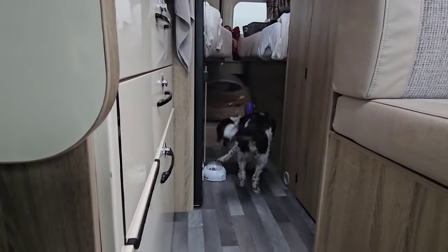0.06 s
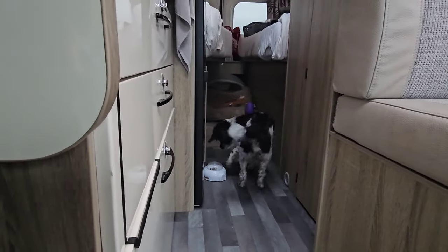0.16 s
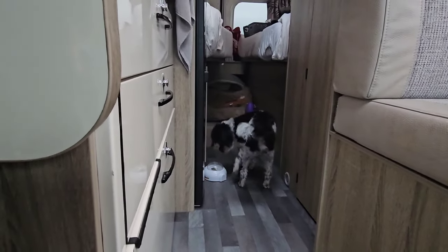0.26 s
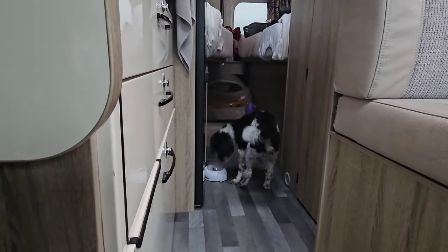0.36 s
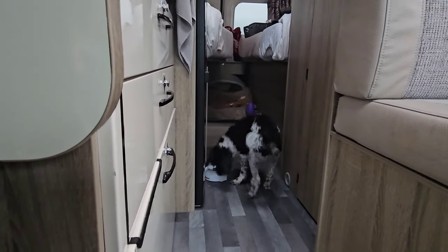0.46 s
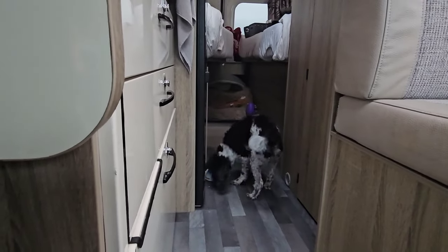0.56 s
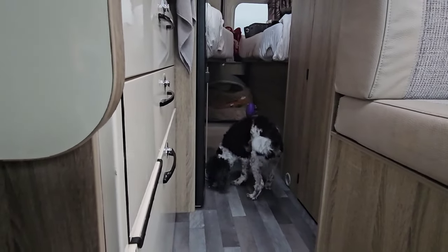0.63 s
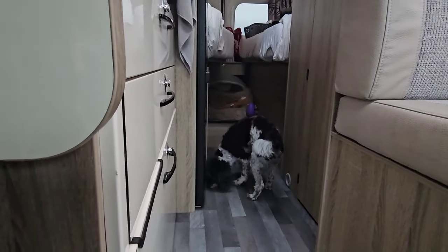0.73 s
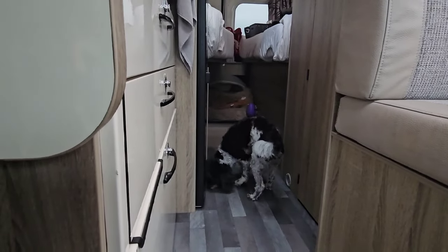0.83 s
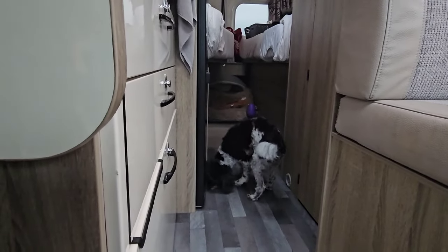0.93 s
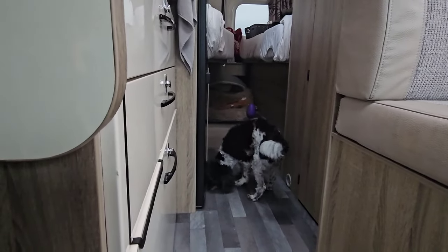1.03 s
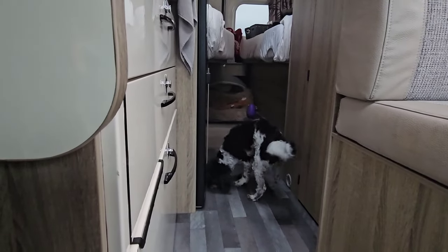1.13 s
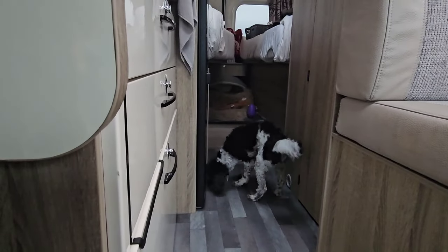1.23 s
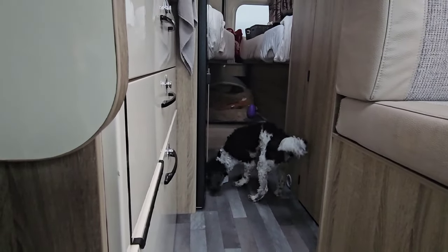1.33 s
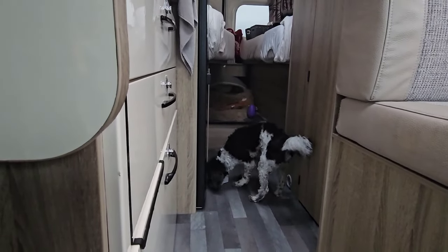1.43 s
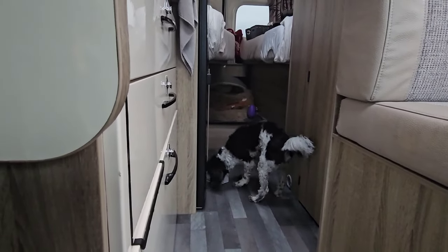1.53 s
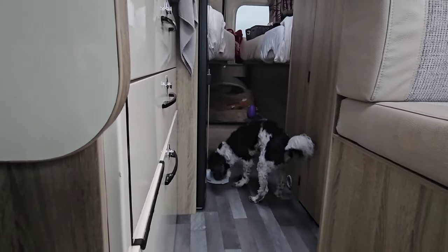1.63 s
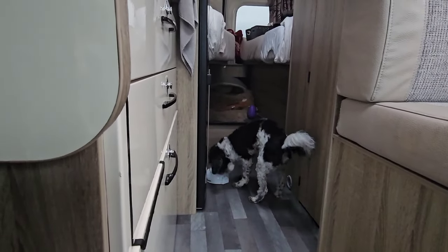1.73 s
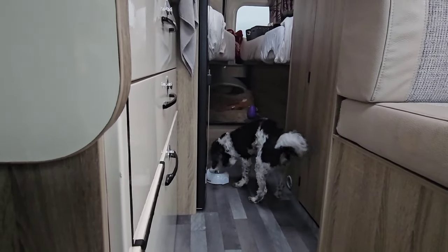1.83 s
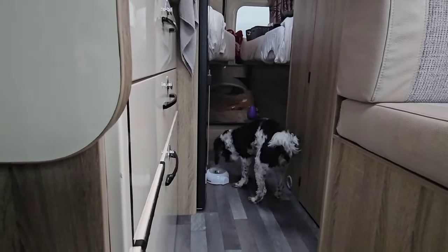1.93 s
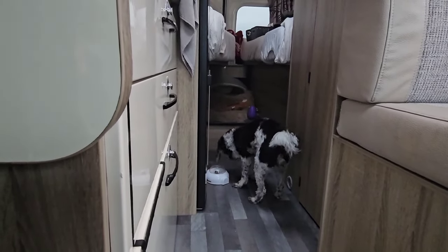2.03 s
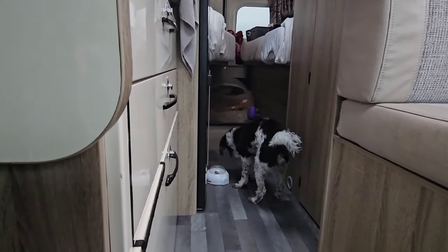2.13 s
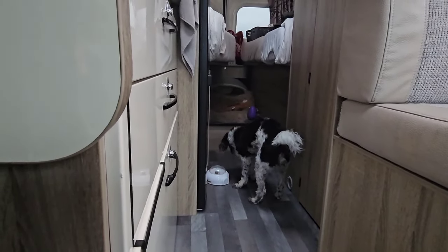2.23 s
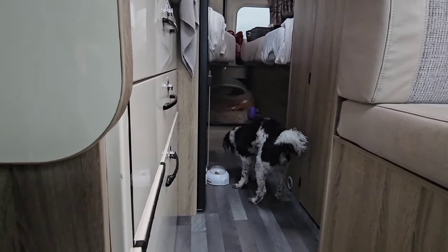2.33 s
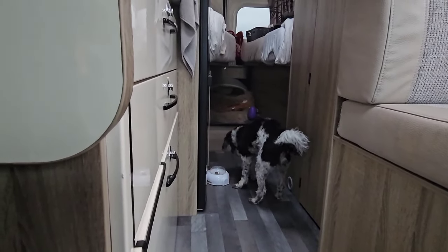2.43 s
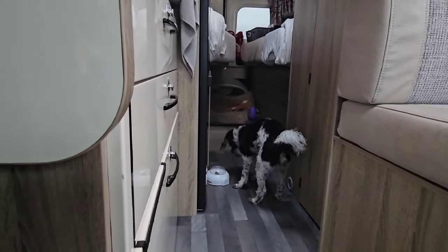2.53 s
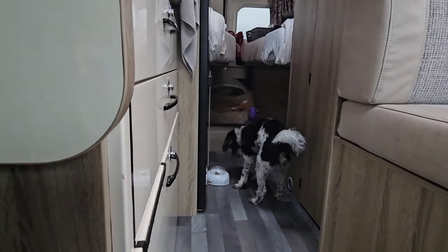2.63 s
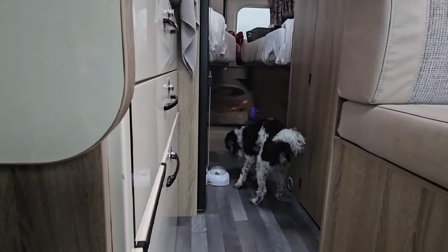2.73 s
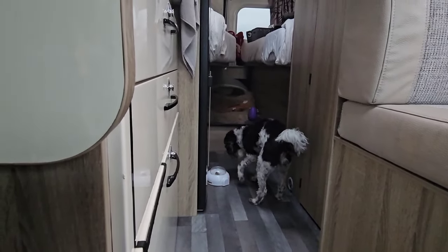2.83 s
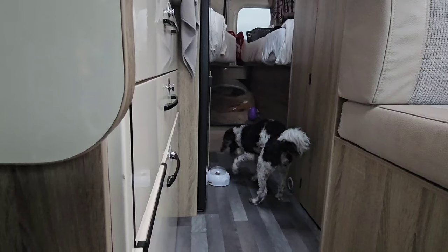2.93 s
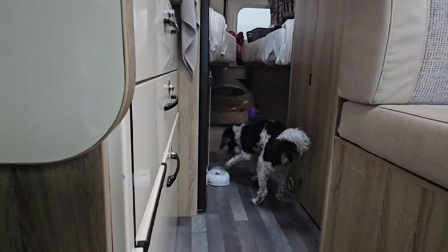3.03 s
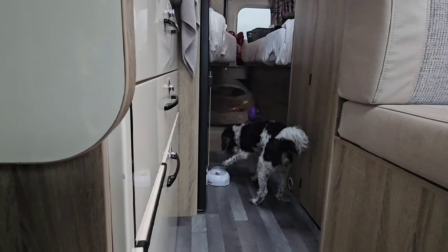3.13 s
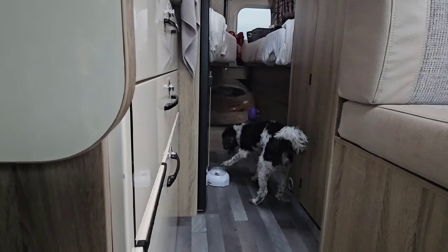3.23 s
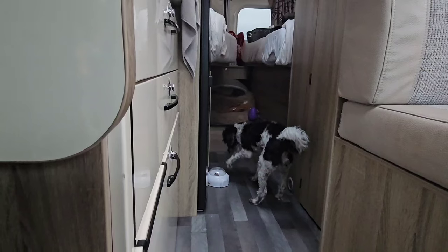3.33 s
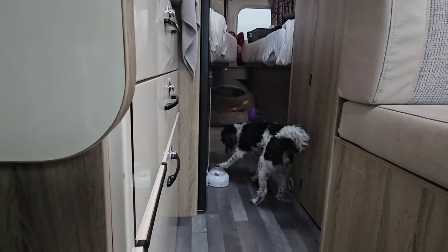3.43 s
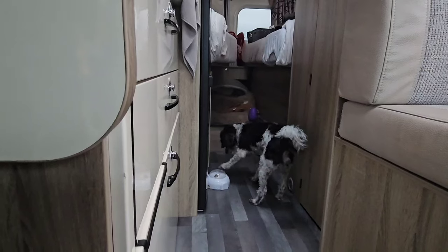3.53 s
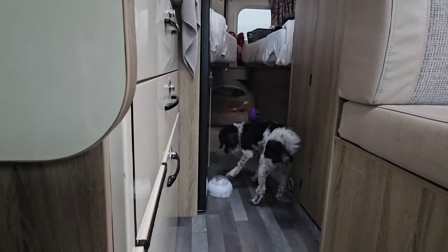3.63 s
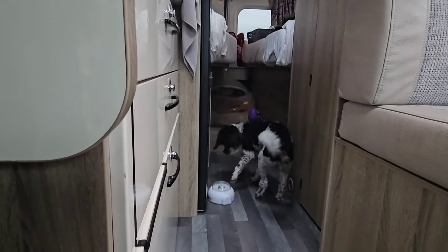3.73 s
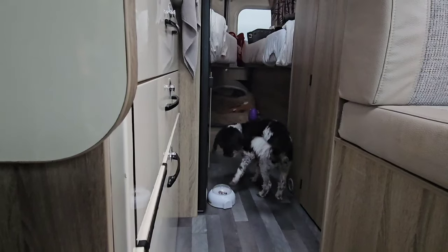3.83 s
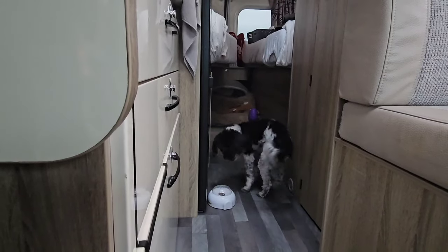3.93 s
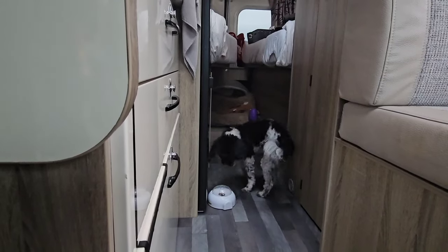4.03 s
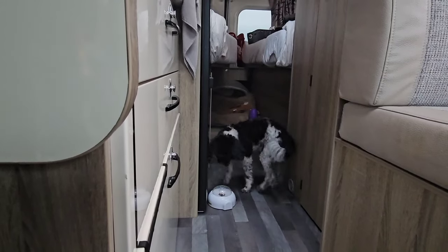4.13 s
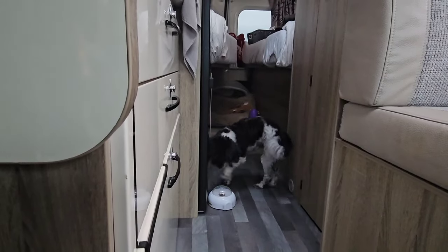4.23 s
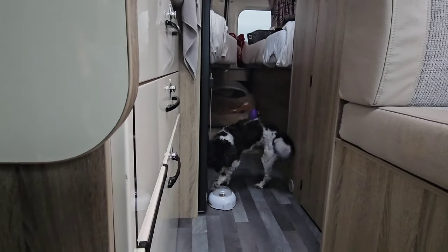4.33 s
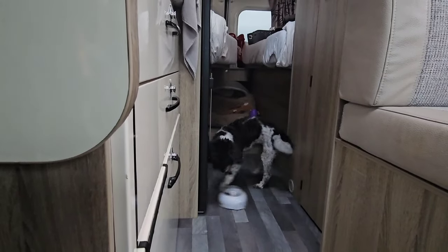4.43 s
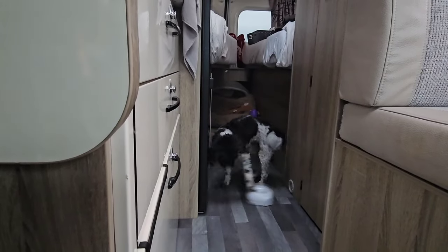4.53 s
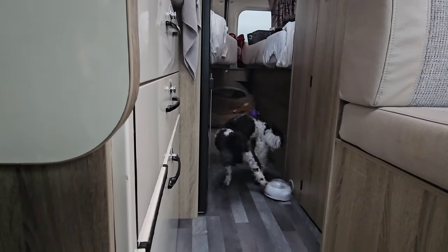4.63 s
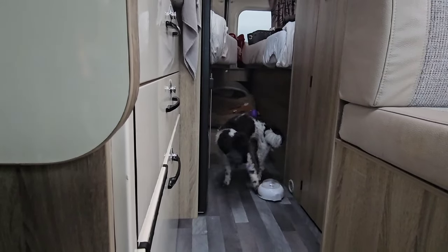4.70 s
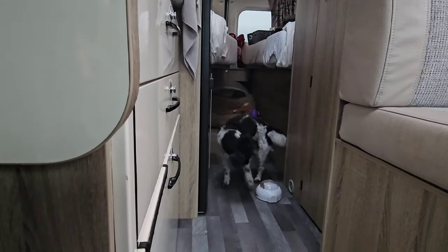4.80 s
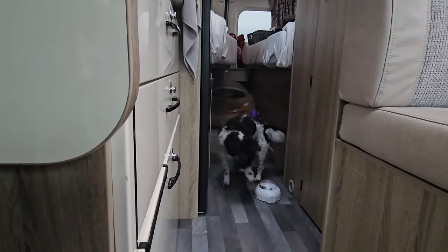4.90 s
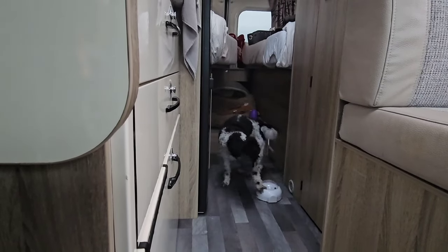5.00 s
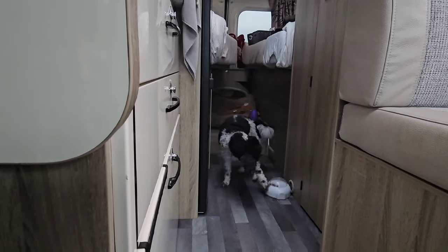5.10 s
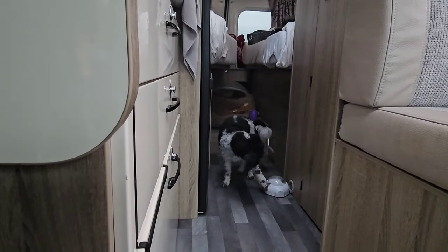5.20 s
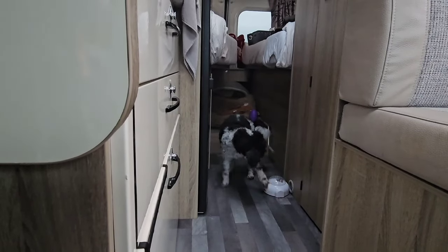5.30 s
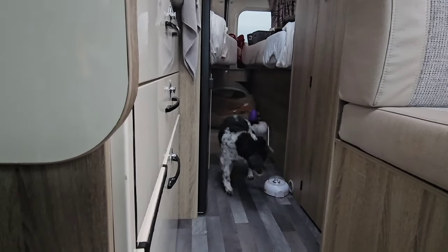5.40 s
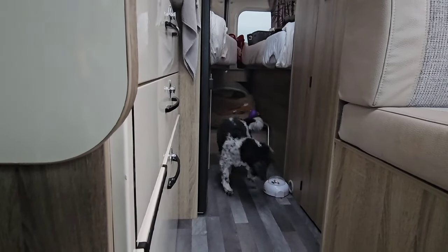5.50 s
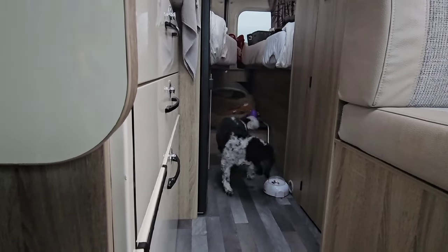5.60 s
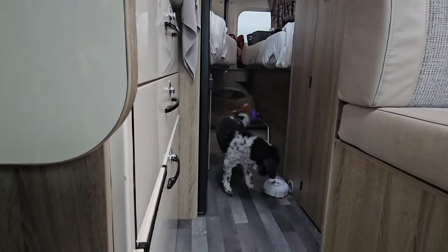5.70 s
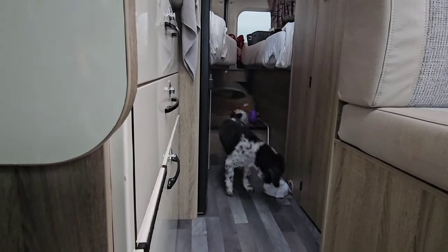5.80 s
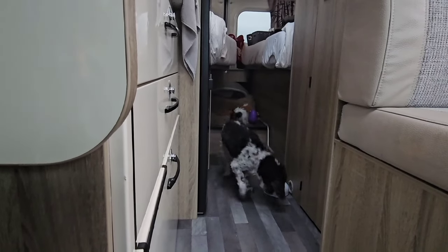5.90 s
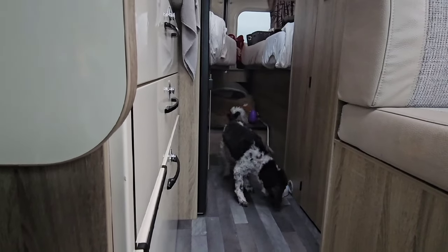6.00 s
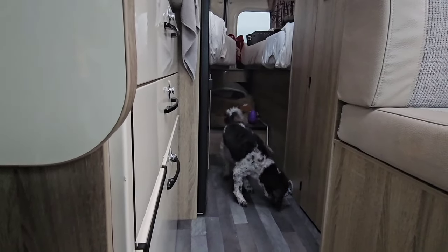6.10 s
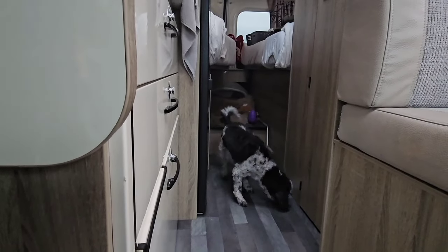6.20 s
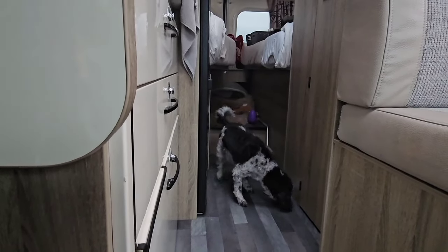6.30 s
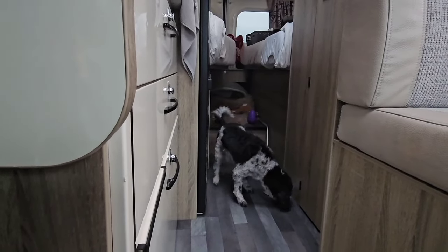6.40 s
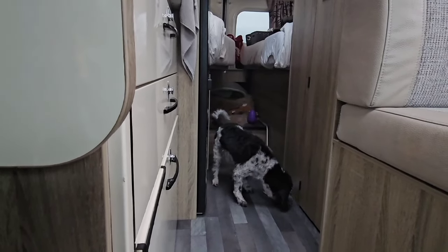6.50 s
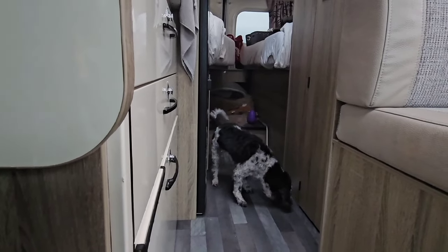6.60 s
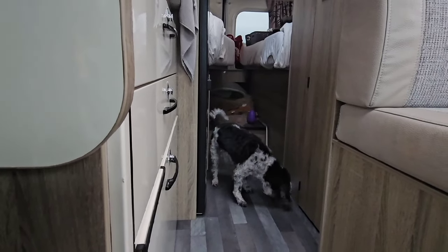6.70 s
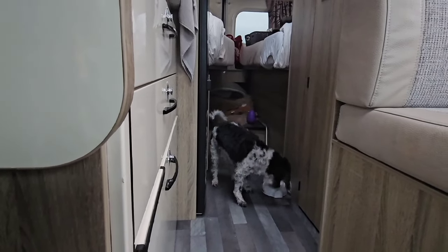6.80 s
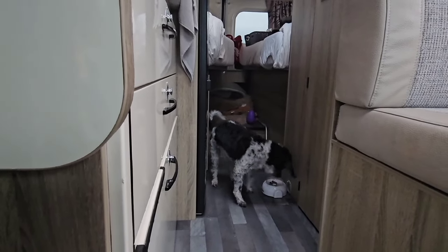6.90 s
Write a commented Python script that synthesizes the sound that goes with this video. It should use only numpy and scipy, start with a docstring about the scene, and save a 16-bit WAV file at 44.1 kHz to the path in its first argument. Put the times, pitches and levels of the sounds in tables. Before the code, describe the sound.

A bright claw clack on a plastic shell opens, followed by near quiet with faint air noise, low hum, ticking claws and gentle muzzle bumps. After three seconds the toy is pawed, scuffing and tapping on the hard floor, then swiped noisily with treats rattling and hollow bangs. Afterwards only soft paws and nudges remain. Short, tight indoor echoes; some dry handling rasp on the camera microphone.

```python
"""Small dog with a treat toy

A small dog works a hollow plastic treat toy along the vinyl floor of a camper van.
Claws clack on the shell, the muzzle knocks and nudges it, and swipes send it scraping into the cupboards.
Paws step and brush about, and fingers rub on the camera, over faint air noise and a low hum.
Blows ring shaped spectra, rubbing is many tiny slips, and random echoes make the narrow cabin.
"""
import sys
import numpy as np
from scipy import signal
from scipy.fft import rfft, irfft
from scipy.io import wavfile
from scipy.ndimage import uniform_filter1d

SR = 44100
rng = np.random.default_rng(int(sys.argv[2]) if len(sys.argv) > 2 else 0)


def persist_wave(psi):
    """Save psi, clipped to +-1, as 16-bit WAV."""
    counts = np.round(np.clip(psi, -1, 1) * 32767).astype(np.int16)
    wavfile.write(sys.argv[1], SR, np.atleast_2d(counts).T)


N = 306495
TIME = np.arange(N) / SR  # seconds

# Resonances of the toy's shell. Each row: pitch in Hz, width in Hz, lift in dB.
SHELL_MODES = [(210.7, 19, 15), (296, 36, 13), (340, 30, 7.5), (482.7, 56, 9), (604, 34, 6.5),
               (1410, 70, 10.5), (810, 110, 3.5), (1980, 46, 4.5), (2410, 68, 7), (2656, 34, 5),
               (3088, 71, 5.5), (4870, 71, 6)]


def amp(db):
    """Turns decibels into a gain."""
    return 10 ** (np.asarray(db) / 20)


def evened(x):
    """Scales a signal to an average (rms) level of 1."""
    return x / np.sqrt(np.mean(x ** 2) + 1e-20)


def read(points, hz):
    """Reads values between the points of a table, on a log-frequency axis."""
    f, value = np.transpose(points)
    return np.interp(np.log(hz + 1), np.log(f + 1), value)


def add(mix, s, sound):
    """Mixes a stereo sound in at time s, in seconds."""
    part = mix[:, max(round(s * SR), 0):][:, :sound.shape[1]]
    part += sound[:, :part.shape[1]]


def level(rows, column=1, power=1.34):
    """Gain of strokes that speed up, hold and slow down evenly; loudness is a power of speed."""
    gain = np.zeros(N)
    for row in rows:
        corners = np.cumsum([row[0], *row[-3:]])
        speed = np.interp(TIME, corners, [0, 1, 1, 0])
        gain += amp(row[column]) * speed ** power
    return gain


def ring(spectrum, modes=(), bright=0, spot_db=0, size=4096):
    """Response of a struck body: a broad spectrum, lifted at resonances and rippled by the spot hit."""
    hz = abs(np.fft.fftfreq(size, 1 / SR))
    # brightness tilts the spectrum in dB per octave; it levels off below 300 Hz
    db = read(spectrum, hz) + bright * np.log2(np.maximum(hz, 300) / 1000)
    for centre, width, lift in modes:
        db = db + lift / (1 + (2 * (hz - centre) / width) ** 2)
    knots = np.geomspace(500, 16000, 80)
    db = db + spot_db * np.interp(hz, knots, rng.standard_normal(len(knots)))
    # minimum phase: the sound starts at the contact, never before it
    bins = np.exp(signal.hilbert(np.log(amp(db))).conj())
    return np.fft.ifft(bins).real[None, :size // 2]


def at_microphones(pair):
    """Two unrelated signals become alike in the bass, as at two close microphones."""
    # Each row: pitch in Hz, likeness of left and right (1 is identical).
    likeness = [(100, .98), (250, .94), (500, .88), (800, .78), (1300, .1), (2800, .2), (5000, 0.02)]
    a, b = rfft(pair)
    same = read(likeness, np.fft.rfftfreq(pair.shape[1], 1 / SR))
    shared, apart = a * np.sqrt(1 + same), b * np.sqrt(1 - same)
    return irfft([shared + apart, shared - apart], pair.shape[1])


def cabin(near_db=-4.5, near_s=0.03, late_db=-21.0, late_t60=0.23, size=12000):
    """Reflections from one spot in the aisle: strong near walls, a quick decay and a faint long tail."""
    # Quick decay of the echoes. Each row: pitch in Hz, time to fall by 60 dB in seconds.
    decay_times = [(100, 0.26), (500, 0.11), (1500, 0.16), (5000, 0.16), (14000, 0.19)]
    t = np.arange(size) / SR
    echoes = rng.choice([-1., 1.], (2, size)) * (rng.random((2, size)) < .15)
    bins, hz = rfft(at_microphones(echoes)), np.fft.rfftfreq(size, 1 / SR)
    tail = amp(late_db) * np.exp(-np.log(1000) * t / late_t60)
    out = 0
    for centre, t60 in decay_times:
        # each band fades out towards the neighbouring rows
        band = read([(f, float(f == centre)) for f, _ in decay_times], hz)
        out = out + irfft(bins * band, size) * (np.exp(-np.log(1000) * t / t60) + tail)
    return out * (1 + amp(near_db) * np.exp(-t / near_s))


def blow(body, db, build_s=.0015, snap_db=-40, snap_s=.004, size=440):
    """One blow, heard by its echoes; snap lifts the first ones, db sets the loudest 10 ms."""
    paths = cabin()
    t = np.arange(paths.shape[1]) / SR
    paths = paths * (1 - np.exp(-t / build_s)) * (1 + amp(snap_db) * np.exp(-t / snap_s))
    sound = signal.fftconvolve(paths, body, axes=1)
    loudest = uniform_filter1d((sound ** 2).mean(0), size).max()
    return amp(db) * sound / np.sqrt(loudest)


def strikes(rows, spectrum, modes, gain_db, thud_db, thud_lag, snap_db):
    """Hard contacts: the body rings at once and the floor thuds just after (thud_lag in seconds)."""
    # Spectrum of the thud. Each row: pitch in Hz, level in dB.
    thud_spectrum = [(25, -50), (90, -7), (150, 3.5), (205, 3.5), (265, -10.5), (3000, -52)]
    out = np.zeros((2, N))
    for s, db, bright, thud in rows:
        body = ring(spectrum, modes, bright, spot_db=3.5)
        add(out, s, blow(body, db + gain_db, snap_db=snap_db))
        add(out, s + thud_lag, blow(ring(thud_spectrum), db + thud + thud_db))
    return out


def touches(rows, spectrum, gain_db, width_hz, lift_db, soft_s):
    """Light, dull blows on the toy; the spot that is touched decides which mode rings most."""
    out = np.zeros((2, N))
    for s, db, hz in rows:
        body = ring(spectrum, [(hz, width_hz, lift_db)])
        add(out, s, blow(body, db + gain_db, soft_s))
    return out


def slips(per_s, spread_db):
    """Friction as many tiny slips of uneven size, at random moments."""
    train = (rng.random(N) < per_s / SR) * rng.choice([-1., 1.], N)
    return train * amp(spread_db * np.minimum(rng.exponential(1, N), 4))


def rubbing(body, per_s, spread_db):
    """Slips make a body ring in the cabin."""
    paths = signal.fftconvolve(cabin(), body, axes=1)
    return evened(signal.oaconvolve(slips(per_s, spread_db)[None], paths, axes=1)[:, :N])


def claw_clacks():
    """Claws strike the shell: its rim rings and the paw thuds a moment later."""
    # Each row: start in seconds, level in dB before a common gain, brightness in dB per octave,
    # paw thud in dB against that level before a common gain.
    hits = [(0.1143, -20, 4.5, -34.5), (3.1373, -30, 4.3, -26), (3.5112, -17, 2, -19.5),
            (4.3835, -16.5, 3.5, -21), (4.458, -36, 4.5, -23), (5.0595, -17.5, 4.5, -18.5)]
    # Each row: pitch in Hz, level in dB.
    spectrum = [(200, -23), (1100, -8.5), (3000, -2.5), (5500, 2.5), (8800, -2.5), (10300, -8), (13000, -4),
                (16000, -9.5)]
    # Resonances of the rim. Each row: pitch in Hz, width in Hz, lift in dB.
    rim_modes = [(850, 47, 23), (1467, 130.8, 17), (4670, 429, 14), (5370, 210, 8), (6980, 960, 8.1),
                 (8660, 1200, 7.1)]
    return strikes(hits, spectrum, rim_modes, gain_db=-2.0, thud_db=-5.5, thud_lag=0.0055, snap_db=-10.0)


def treats(per_s=70, spread_db=2.5, count=3):
    """Loose treats and grit hit the shell, each piece with its own colour."""
    # Each row: pitch in Hz, level in dB.
    spectrum = [(40, -41.5), (300, -17.5), (1900, 1), (6500, -2), (10000, -15.5), (13000, -12.5),
                (16000, -22)]
    pieces = [rubbing(ring(spectrum, SHELL_MODES, spot_db=3.5), per_s, spread_db) for _ in range(count)]
    return evened(sum(pieces))


def slide(judder_db=3.0, rattle_db=-2.0, scuff_db=-12.0, scuff_power=0.81, travel_hz=2.4, size=700):
    """A lightly dragged toy mostly scuffs; pressed hard, its rim sticks and slips and treats rattle."""
    # Shoves of the toy. Each row: start in seconds, drag on the floor in dB and grit under the rim
    # in dB (both shaped further below), speed-up, glide and slow-down in seconds.
    shoves = [(.115, -42, -38.5, 0.018, 0.016, 0.12), (3.28, -40.5, -45.5, 0.087, 0.0093, 0.089),
              (3.53, -33.5, -38, 0.1, 0.085, .37), (3.76, -66, -46.5, 0.036, 0.022, 0.037),
              (4.44, -20.5, -17, 0.17, 0.15, .06), (4.81, -34, -30, 0.036, 0.015, 0.21),
              (5.04, -28, -28.5, .17, 0.044, 0.089)]
    # Sticking rim. Each row: pitch in Hz, level in dB.
    drag_spectrum = [(25, -59.5), (50, -36), (120, 2), (190, -2), (250, -14.5), (400, -0.5), (750, -1),
                     (1100, -18.5), (2500, -23), (9000, -65)]
    # Light scuff. Each row: pitch in Hz, level in dB.
    scuff_spectrum = [(100, -0.5), (450, -4), (800, -0.5), (1500, -2), (8000, -38.5)]
    grip = amp(1.2 * evened(uniform_filter1d(rng.standard_normal(N), size)))  # uneven pressure
    drag = grip * level(shoves, column=1, power=1.4)
    grit = grip * level(shoves, column=2, power=2.0)
    turn = 2 * np.pi * travel_hz * TIME
    out = 0
    # the echoes change as the toy travels: two sets of them trade places
    for place in (np.sin(turn), np.cos(turn)):
        judder = rubbing(ring(drag_spectrum, SHELL_MODES), per_s=400, spread_db=2.5)
        judder = amp(judder_db) * drag ** 1.153 * judder
        scuff = rubbing(ring(scuff_spectrum, spot_db=5.5), per_s=250, spread_db=2.5)
        scuff = amp(scuff_db) * drag ** scuff_power * scuff
        rattle = amp(rattle_db) * grit * treats()
        out = out + place * (judder + scuff + rattle)
    return out


def chatter(count=4, first_gap_s=.0095, gap_growth=1.6, loss_db=3):
    """Turns a chattering bump into a run of ever weaker strikes, ever further apart."""
    # Each row: start in seconds, level in dB before a common gain, brightness in dB per octave,
    # floor thud in dB against that level before a common gain, chatter time in seconds.
    first_hits = [(3.641, -30, -1.5, 4.5, 0), (3.793, -49, -4, -11, 0), (4.546, -24, -3, 5, 0),
                  (4.629, -13.5, -4.5, -15, 0), (4.716, -9.5, 0.5, -29, .035), (4.777, -14.5, -3.5, -7, 0),
                  (4.852, -21, -3.5, 1.5, 0), (5.195, -10.5, -1.8, -7, .06)]
    rows = []
    for s, db, bright, thud, length in first_hits:
        lag = 0
        for k in range(count):
            if lag <= length:
                rows.append((s + lag, db - k * loss_db, bright, thud))
            lag += first_gap_s * gap_growth ** k
    return rows


def cupboard_bumps():
    """The toy hops and hits the cupboards, so its whole shell rings."""
    # Each row: pitch in Hz, level in dB.
    spectrum = [(25, -53), (60, -23.5), (170, -3), (250, -14.5), (400, 2), (1100, -6.5), (2200, -0.5),
                (6500, -1.5), (8600, -3), (10000, -11), (13000, -8.5), (16000, -14.5)]
    return strikes(chatter(), spectrum, SHELL_MODES,
                   gain_db=-0.5, thud_db=-6.5, thud_lag=.003, snap_db=-14.5)


def light_taps():
    """Light, dull taps on the toy, each time with another main pitch: first a paw lands on it, then the tipping
    toy taps its rim on the floor."""
    # Each row: start in seconds, level in dB before a common gain, main pitch in Hz.
    hits = [(3.158, -40, 860), (3.587, -38, 840), (3.955, -49.5, 496), (4.484, -37, 700), (4.992, -38, 470)]
    # Each row: pitch in Hz, level in dB.
    spectrum = [(80, -12), (600, -2), (1400, -6.5), (10000, -40)]
    return touches(hits, spectrum, gain_db=-2.0, width_hz=70, lift_db=14.5, soft_s=0.0023)


def knocks(nose_db=-5.0, soft_s=0.00093):
    """Soft nose blows ring the low modes of the hollow toy, each at another spot."""
    # Each row: start in seconds, level in dB before a common gain.
    hits = [(1.5485, -23), (1.5555, -19.5)]
    # Each row: pitch in Hz, level in dB.
    spectrum = [(80, -22), (230, -1.5), (450, 0.5), (900, -14), (1800, -26), (16000, -44)]
    # Resonances of the hollow toy. Each row: pitch in Hz, width in Hz, lift in dB.
    hollow_modes = [(235, 50, 4), (339, 50, 8), (560, 80, 16), (786, 50, 15), (1010, 100, 8)]
    out = np.zeros((2, N))
    for s, db in hits:
        body = ring(spectrum, hollow_modes, spot_db=2)
        add(out, s, blow(body, db + nose_db, soft_s))
    return out


def muzzle(rub_db=-4.5):
    """The muzzle nudges the toy at changing spots and stays pressed on it, a dull rumble."""
    # Nudges. Each row: start in seconds, level in dB before a common gain, main pitch in Hz.
    nudges = [(1.701, -43, 380), (1.879, -42.5, 371), (1.919, -44, 657), (2.023, -36, 520),
              (2.132, -40, 500), (2.226, -38.5, 225), (2.339, -42.5, 638), (2.437, -49, 380),
              (2.534, -45, 517), (2.622, -43, 434), (2.669, -44, 415), (6.165, -42, 230), (6.222, -43, 369),
              (6.313, -36, 376), (6.477, -42, 358), (6.631, -46.5, 366)]
    # Presses. Each row: start in seconds, level in dB before a common gain, rise, hold and fall in seconds.
    presses = [(1.7, -50, 0.32, 0.703, 0.086), (6.16, -55, 0.047, 0.2, 0.061)]
    # Each row: pitch in Hz, level in dB.
    spectrum = [(120, -15.5), (215, 3.5), (290, -6.5), (375, 3), (680, -2), (1000, -18), (9000, -47)]
    nudging = touches(nudges, spectrum, gain_db=-3.5, width_hz=36, lift_db=10, soft_s=0.01)
    rumble = rubbing(ring(spectrum), per_s=500, spread_db=0.0)
    return nudging + amp(rub_db) * level(presses, power=0.33) * rumble


def boom(start_s=3.648, swell_s=0.024):
    """The floor panel booms under the tipping toy: one low mode that swells and dies away."""
    # One row: level in dB before the swell and decay, pitch in Hz, time to fall by 60 dB in seconds.
    panel_mode = (-21, 66, 0.4)
    db, hz, t60 = panel_mode
    t = np.maximum(TIME - start_s, 0)
    shape = (1 - np.exp(-t / swell_s)) * np.exp(-np.log(1000) * t / t60)
    return amp(db) * shape * np.sin(2 * np.pi * hz * t)


def claw_steps():
    """Claws tick on the floor, each with a thud of the paw just after."""
    # Each row: start in seconds, level in dB before a common gain, brightness in dB per octave,
    # paw thud in dB against that level before a common gain.
    hits = [(.197, -40.5, 5, -22), (.4471, -35, -0.5, -7.5), (.5512, -40, 2, -28),
            (1.1688, -42.5, -4.5, -22), (1.2598, -43, 1, 1.5), (1.5535, -32, -1, -44),
            (2.0069, -38, 0, -12), (3.239, -50.5, 1.5, -20), (4.2245, -38, -0.5, -8),
            (5.4775, -40, 1, -3.5), (5.804, -51, 0, -28), (6.048, -42, -1, -17)]
    # Each row: pitch in Hz, level in dB.
    spectrum = [(100, -8), (500, -1.5), (4800, 2), (8500, -3.5), (10200, -19.5), (16000, -15)]
    return strikes(hits, spectrum, (), gain_db=-1.5, thud_db=-3.5, thud_lag=0.00275, snap_db=2.0)


def pats(pad_db=-2.5, soft_s=0.004):
    """The pads of the shifting feet land softly, so each blow builds up slowly."""
    # Each row: start in seconds, level in dB before a common gain.
    landings = [(0.974, -59.5), (1.2, -49), (5.385, -45.5), (5.545, -59.5)]
    # Each row: pitch in Hz, level in dB.
    spectrum = [(1000, -1), (2800, 10.5), (5000, -9), (11000, -29)]
    out = np.zeros((2, N))
    for s, db in landings:
        add(out, s, blow(ring(spectrum, spot_db=1.5), db + pad_db, soft_s))
    return out


def paws(fur_db=-1.0):
    """Paws and fur brush the floor: dense slips that follow each stroke's speed."""
    # Each row: start in seconds, level in dB before a common gain, rise, hold and fall in seconds.
    strokes = [(0, -41.5, 0.00074, 0.0046, 0.12), (.645, -50, 0.033, 0.021, 0.083),
               (1.75, -48.5, .14, 0.013, 0.027), (3.955, -43.5, 0.014, 0.038, 0.059),
               (4.08, -50, 0.0043, 0.014, 0.075), (5.36, -49.5, 0.026, 0.068, 0.12)]
    # Each row: pitch in Hz, level in dB.
    spectrum = [(200, 2.5), (900, -7), (1600, -4), (4000, -6.5), (7500, -14.5), (10500, -26)]
    grain = rubbing(ring(spectrum), per_s=2400, spread_db=7.0)
    return amp(fur_db) * level(strokes) * grain


def skin_slips(spectrum, per_s, spread_db):
    """Slips of skin reach the two microphones directly, without echoes."""
    pair = np.array([slips(per_s, spread_db), slips(per_s, spread_db)])
    return evened(signal.oaconvolve(at_microphones(pair), ring(spectrum), axes=1)[:, :N])


def handling(finger_db=-2.5, grip_db=1.6, catch_db=-53.5, catch_power=0.35, catch_s=0.0015, size=256):
    """Fingers rasp on the camera, too close for echoes; a slow rub breaks up into separate catches."""
    # Each row: start in seconds, level in dB before a common gain, rise, hold and fall in seconds.
    rubs = [(1.77, -64, 0.01, 0.068, .02), (2.699, -44, 0.0019, 0.084, 0.019),
            (2.77, -45.5, 0.052, 0.081, 0.048), (6.19, -53.5, 0.13, 0.04, 0.063),
            (6.685, -47.5, 0.13, 0.016, 0.088)]
    # Fine rasp of the skin. Each row: pitch in Hz, level in dB.
    skin_spectrum = [(100, -4.5), (4500, 2), (10000, -3), (16000, -4)]
    # One catch of the skin. Each row: pitch in Hz, level in dB.
    catch_spectrum = [(1500, -1), (5000, 5), (9000, 4), (16000, -22.5)]
    strength = level(rubs)
    grip = amp(grip_db * evened(uniform_filter1d(rng.standard_normal(N), 900)))
    fine = skin_slips(skin_spectrum, per_s=4000, spread_db=3.0)
    catches = skin_slips(catch_spectrum, per_s=40, spread_db=2.2)
    # each catch is a short burst of noise
    rasp = rng.standard_normal((2, size)) * np.exp(-np.arange(size) / SR / catch_s)
    catches = evened(signal.oaconvolve(catches, rasp, axes=1)[:, :N])
    catch_gain = amp(catch_db) * (strength / strength.max()) ** catch_power
    return amp(finger_db) * strength * grip * fine + catch_gain * catches


def background(waver=.15, air_db=-65.5):
    """Faint air noise that swells and sinks, and a wavering low hum of a few steady tones."""
    # Colour of the air noise. Each row: pitch in Hz, level in dB.
    air_spectrum = [(25, -17), (70, -16), (130, -25.5), (280, -26.5), (1000, -40), (1400, -34.5),
                    (2500, -41), (4200, -41), (8500, -45), (11000, -55)]
    # Slow swell of the air noise. Each row: time in seconds, lift in dB.
    air_lift = [(1.4, 8.5), (2.3, 1.34), (6.0, 2.55)]
    # Tones of the hum. Each row: pitch in Hz, level in dB.
    hum_tones = [(32.6, -52), (65, -67), (130, -72.5)]
    hiss = rfft(at_microphones(rng.standard_normal((2, N))))
    air = evened(irfft(hiss * amp(read(air_spectrum, np.fft.rfftfreq(N, 1 / SR))), N))
    # slow random drift, weaker the faster it goes
    waves = [np.sin(2 * np.pi * (f * TIME + rng.random())) / np.sqrt(f) for f in np.geomspace(.3, 3, 10)]
    drift = evened(sum(waves))
    hum = 0
    for hz, db in hum_tones:
        phase = 2 * np.pi * hz * TIME + waver * drift * hz / hum_tones[0][0]
        hum = hum + amp(db) * np.sqrt(2) * np.sin(phase)
    air_gain = amp(air_db + np.interp(TIME, *np.transpose(air_lift)) + .5 * drift)
    return air_gain * air + hum


def scene():
    """Dog, toy, hand and cabin together."""
    toy = claw_clacks() + slide() + cupboard_bumps() + light_taps() + knocks() + muzzle() + boom()
    feet = claw_steps() + pats() + paws()
    return toy + feet + handling() + background()


def record(dry, edge_hz=16200):
    """Peaks beyond full scale clip; then a low-pass filter takes away the highest treble."""
    low_pass = signal.firwin(401, edge_hz, window=("kaiser", 8), fs=SR)
    return signal.oaconvolve(np.clip(dry, -1, 1), low_pass[None], "same")


dry = scene()
out = record(dry)
persist_wave(out)
```